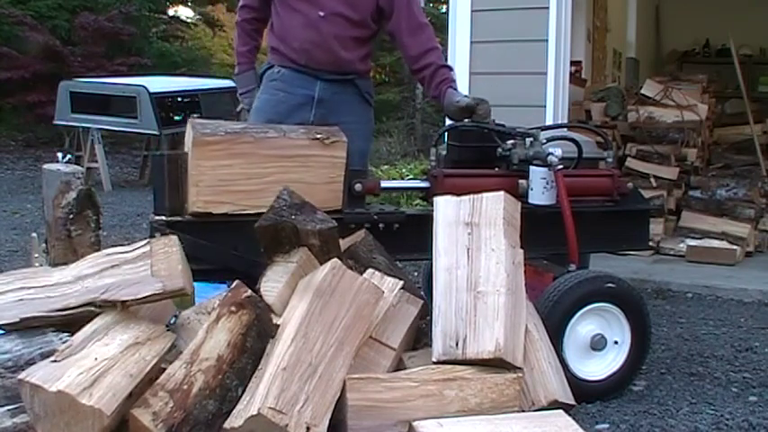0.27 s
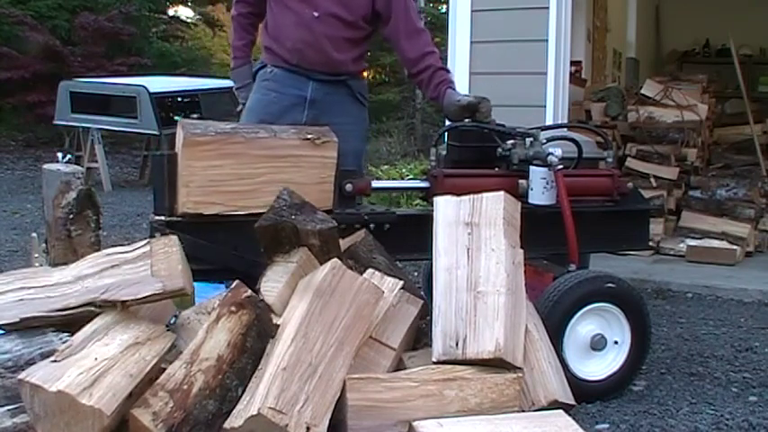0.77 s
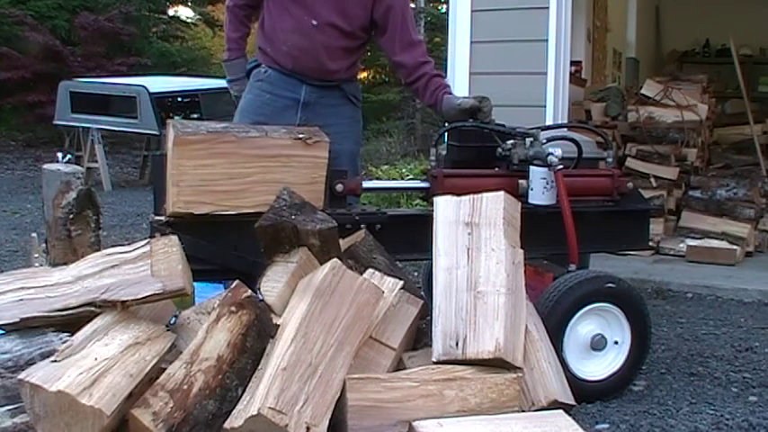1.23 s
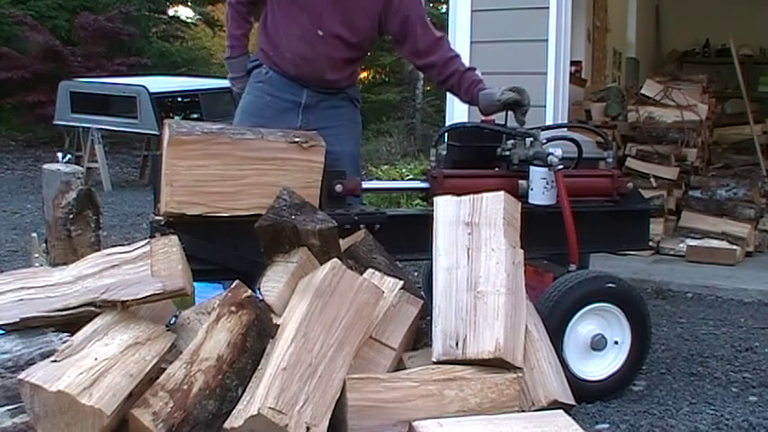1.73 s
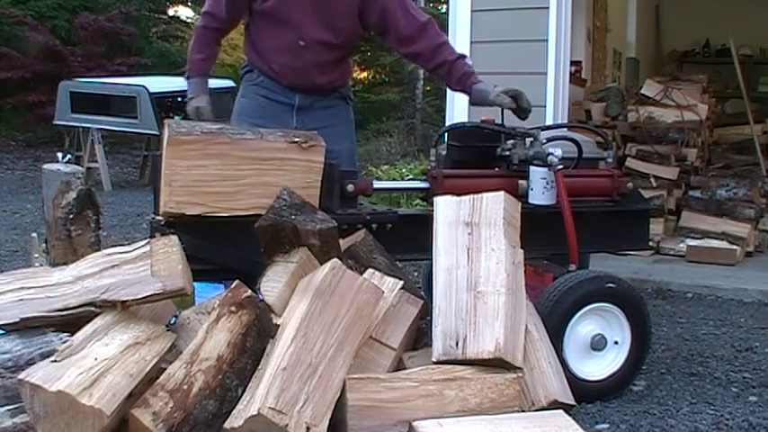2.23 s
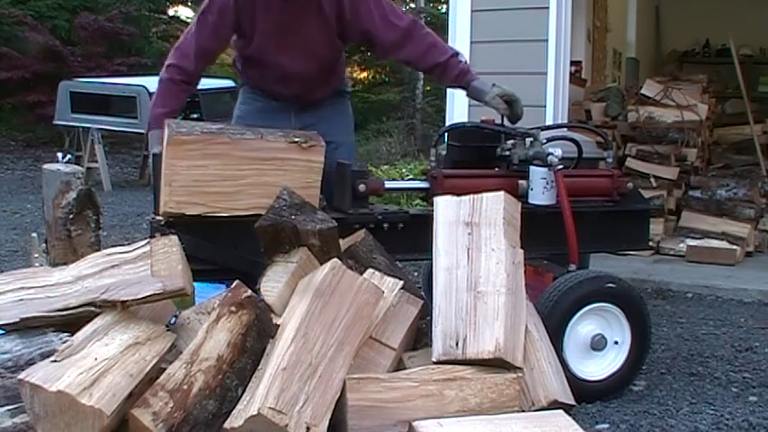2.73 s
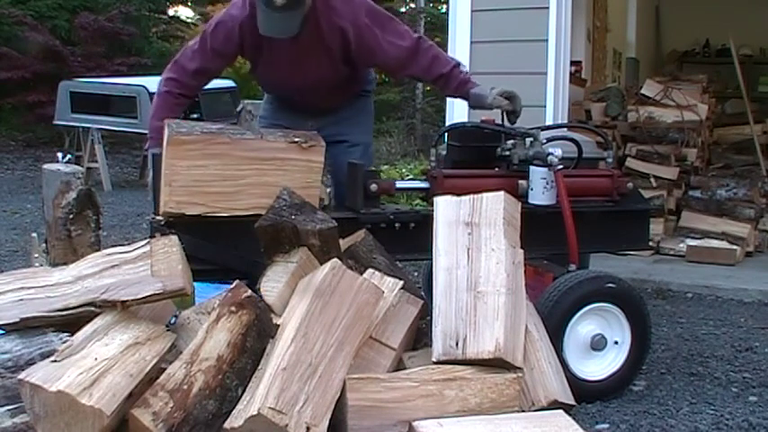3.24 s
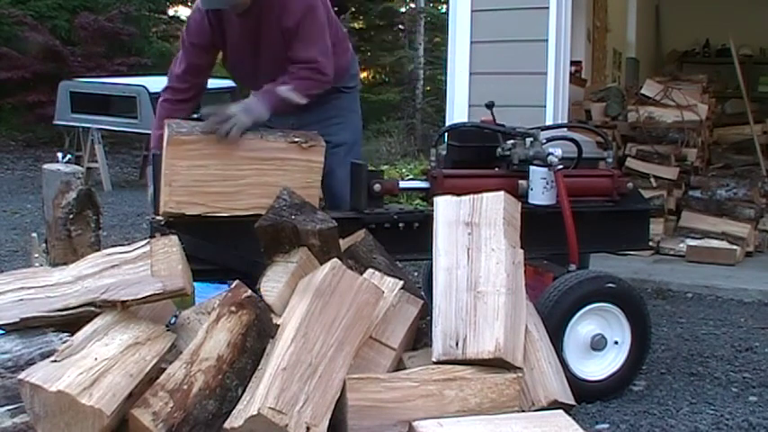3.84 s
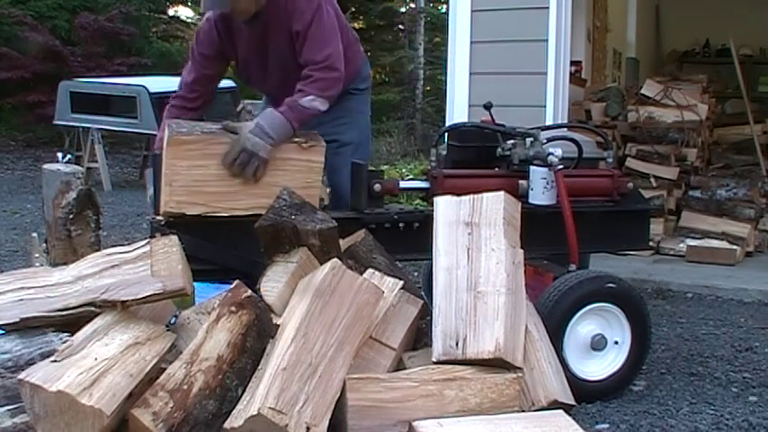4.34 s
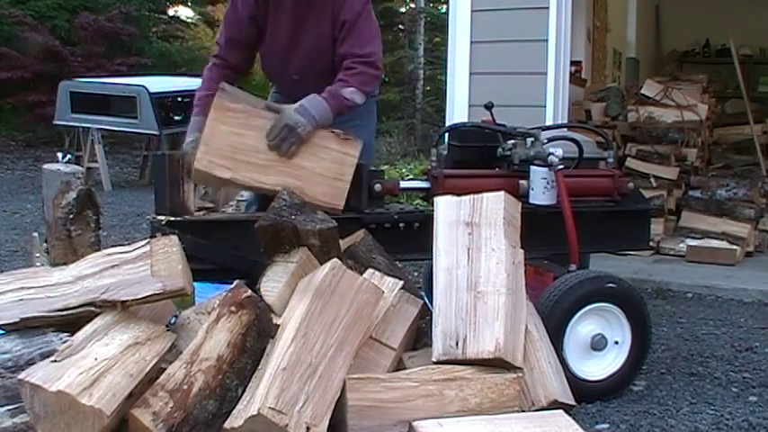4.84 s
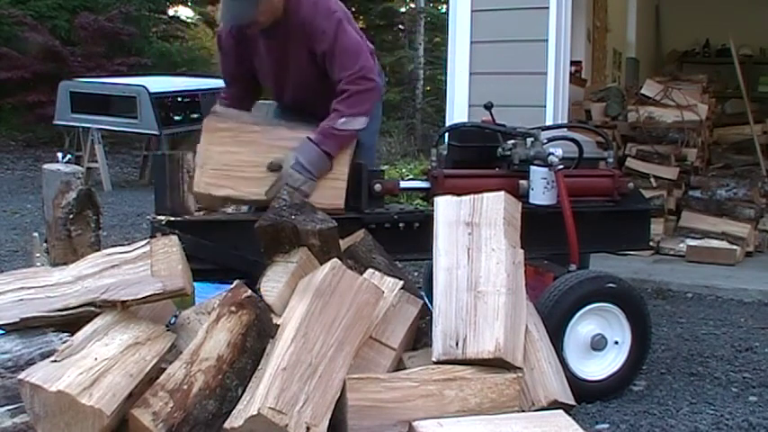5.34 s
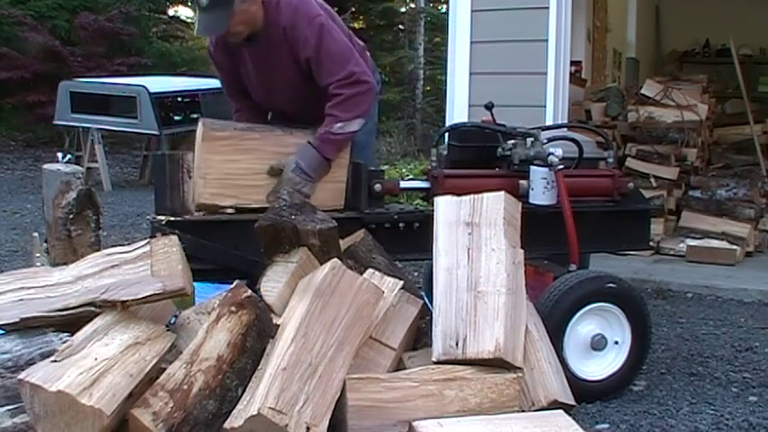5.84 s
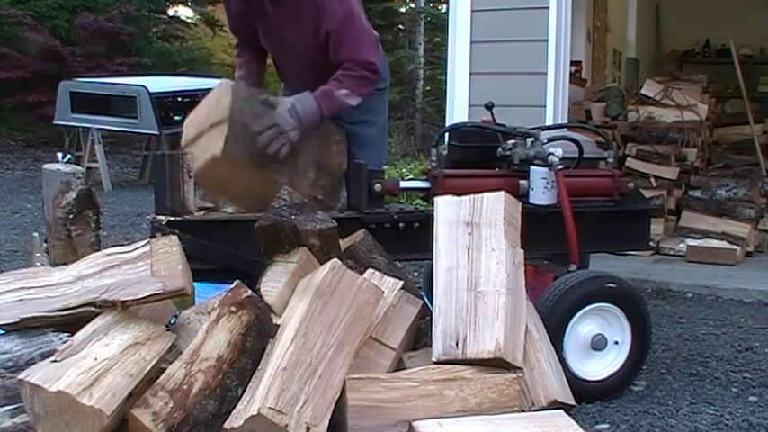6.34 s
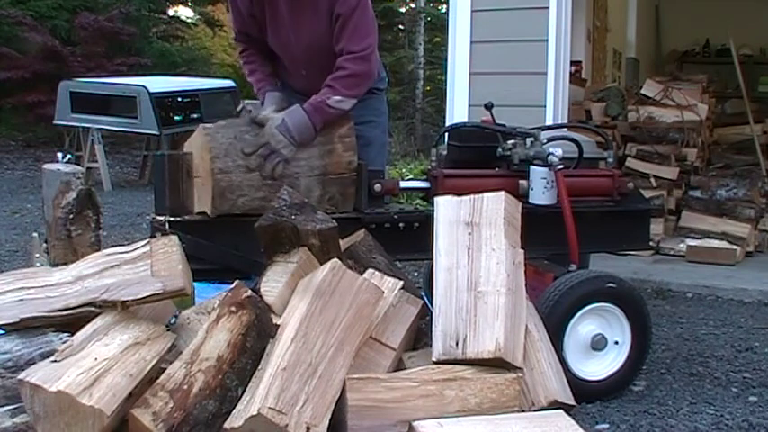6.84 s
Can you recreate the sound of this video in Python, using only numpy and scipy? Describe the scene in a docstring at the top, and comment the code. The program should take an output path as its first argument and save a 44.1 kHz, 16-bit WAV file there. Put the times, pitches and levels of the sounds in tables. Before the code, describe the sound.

A log splitter's small engine putters rapidly with a buzzing metal shroud and airy fan rush. In the first second wood fibres pop, rip and knock while the engine bogs down and recovers. After that it runs steadily, broken only by faint knocks and dry scuffs, until the heavy log thumps on the steel beam near the end. Close, dry, open-air stereo pickup, with the splitting slightly left.

```python
"""On a gravel yard, a single-cylinder four-stroke petrol engine drives a hydraulic log splitter.
The ram forces a log onto the wedge: wood groans, tears and cracks; the engine sags and its governor catches it.
Then the ram returns and the log is turned over on the beam, with knocks, scuffs and thuds.
The engine is a periodic source plus modulated noise and resonances; the wood is noise bursts and damped modes.
A gain control ducks at once on loud sounds and recovers slowly."""
import sys
import numpy as np
from scipy import signal
from scipy.fft import rfft, irfft, next_fast_len
from scipy.io import wavfile
from scipy.ndimage import uniform_filter1d, map_coordinates

SR = 44100
rng = np.random.default_rng(int(sys.argv[2]) if len(sys.argv) > 2 else 0)


def dump(signal):
    """Clip the signal to [-1, 1] and save it as 16-bit WAV at the path in sys.argv[1]."""
    limited = np.clip(np.atleast_2d(signal).T, -1, 1)
    pcm = np.round(limited * 32767).astype(np.int16)
    wavfile.write(sys.argv[1], SR, pcm)


N = 313110

# engine speed, sagging under load and caught by the governor: (time [s], rate [firings/s])
ENGINE_SPEED = [(0, 23.4), (0.25, 20.6), (0.5, 22.4), (0.76, 26.807), (0.96, 24.357), (1.19, 23.916),
                (1.49, 25.221), (2.16, 24.491), (2.5, 24.369), (3.01, 24.551), (3.39, 24.567),
                (3.87, 25.568), (4.32, 24.872), (4.96, 24.659), (5.95, 25.026), (6.42, 24.881),
                (6.7, 25.014), (7.1, 24.949)]
# how hard the engine works: (time [s], level [dB])
EFFORT = [(0, 0.5), (.25, -1), (.48, 0.5), (.75, 6), (1.2, 3), (1.65, 4.5), (2.3, -0.1), (3.6, -0.8),
          (3.95, 0.1), (4.5, -0.55), (7.1, -1.06)]
# how far the ram loads the engine: (time [s], share [0-1])
RAM_LOAD = [(0, 0.72), (1.5, 0.8), (2.1, 0.92), (3.4, 0.97), (3.8, 0.2), (4.4, 0.24)]
START_CYCLE = .475  # place in the engine cycle at the start

# exhaust spectrum after the muffler, ram moving and at rest: (multiple of firing rate [1], relative level [dB])
EXHAUST_WORKING = [(1, -50), (2, -36), (3, -33), (4, -9), (5, -4.5), (6, 4), (7, 0.5), (8, -1.5), (9, -10),
                   (10, 6), (11, 5), (12, -8), (13, -6.5), (14, -0.5), (15, -24), (16, -10), (17, -6),
                   (18, 2.5), (19, 4), (20, 1), (21, -0.5), (22, 1), (23, -3), (24, -6), (25, -7), (26, -5),
                   (27, -4), (28, -6.5), (29, -1)]
EXHAUST_IDLING = [(1, -33), (2, -32), (3, -24.5), (4, -6.5), (5, -4), (6, 4.5), (7, 5), (8, -7.5), (9, -4),
                  (10, 8), (11, -3.5), (12, 4), (13, -8), (14, 2.5), (15, -10), (16, 1), (17, -9), (18, -8),
                  (19, 5), (20, 5), (21, 4.5), (22, -6), (23, 1), (24, -0.5), (25, -2), (26, -23),
                  (27, -5.5), (28, -7), (29, 3)]
# the puff and its reflections in the pipe, ram moving and at rest: (place in cycle [0-1], strength [1])
PUFFS_WORKING = [(.36, 1), (.527, .63), (.616, .56), (0, .64)]
PUFFS_IDLING = [(.359, 1), (.801, -.62), (.236, .78), (.142, .2)]
# exhaust overtones above the muffler's cut-off: (time [s], gain [dB])
OVERTONES = [(0, -6), (.9, -7.5), (1.4, -6.5), (1.8, -3), (2.3, -1.5), (3.55, -3), (3.9, 0.5), (4.8, -1.5),
             (7.1, -0.5)]
# throttle held open by the governor: (time [s], opening [0-1])
THROTTLE = [(0, 1), (.3, 1), (.5, 0.5), (.65, 0.8), (.83, 1), (.87, 0.6), (1.5, .3), (2, 0.04)]
# weak burns as the governor snaps shut: (time [s], gain [dB])
WEAK_BURNS = [(.868, -7), (.945, -9)]
WEAK_BURN_S = 0.011  # standard deviation of each dip
BOOM_HZ, BOOM_WIDTH_HZ, BOOM_DB = 179, 15, 2.5  # muffler resonance; its gain at full throttle
EXHAUST_DB = -31  # at zero effort and zero ram load
RAM_EXHAUST_DB = 1.5  # added at full ram load

# modes of the sheet-metal cowl: (frequency [Hz], width [Hz], place in cycle [0-1])
COWL_MODES = [(765, 8, .33), (884, 6, .76), (899, 6, .76), (1525, 12, .6), (1675, 9, .2)]
# mean level of each of those modes: (level [dB])
COWL_LEVELS = [-32.5, -35, -35.5, -49, -41]
# crankcase knocks: (place in cycle [0-1], frequency [Hz], level with ram moving [dB], level at rest [dB]),
# both levels before effort and random scatter
CHUGS = [(.09, 840, -36, -28), (.31, 800, -18.5, -31), (.39, 800, -30, -22.5), (.66, 820, -29, -24),
         (.93, 850, -31, -22)]
CHUG_RISE_S, CHUG_SCATTER_DB, CHUG_SCATTER_OCTAVES = .0017, 2.3, .06

# clatter bursts: (place in cycle [0-1], standard deviation [cycles], relative strength [1])
STROKES = [(.01, 0.03, 0.68), (0.114, 0.0065, 0.68), (.39, 0.037, 0.35), (.565, 0.0046, 0.25),
           (.73, 0.079, 0.51)]
# share of the clatter that repeats in every cycle: (frequency [Hz], share [0-1])
REPEAT = [(300, .92), (800, .85), (1150, .55), (1600, .5), (2500, .38), (7000, .3)]
# engine block, valves and pump: (frequency [Hz], relative density [dB per Hz])
BLOCK_SPECTRUM = [(60, -43), (200, -12.5), (390, -11.5), (520, -7.5), (680, -5), (860, -1), (1080, -7),
                  (1450, -1.5), (1800, -4), (2250, -4), (2650, -11.5), (3050, -9), (3400, -6.5),
                  (5500, -25), (12000, -35)]
# rush of the cooling fan: (frequency [Hz], relative density [dB per Hz])
FAN_SPECTRUM = [(25, -13), (60, -7), (100, -26), (400, -3), (2000, 1), (3800, -3.5), (4200, 2.5),
                (6500, -1), (9000, 1.5), (11000, -0.5), (12500, -7.5), (16000, -16.5)]
CLATTER_DB, CLATTER_FOLLOWS = -23.5, 1  # machinery gain at zero effort; its rise in dB per dB of effort

# jolts of the shroud: (place in cycle [0-1], standard deviation [cycles], relative strength [1])
JOLTS = [(.05, .04, .8), (.36, .06, .8), (.64, .03, .6), (.8, .035, 1)]
# engine speeds at which the shroud's buzz is set: (rate [firings/s])
RASP_SPEEDS = [24.1, 24.4, 24.6, 24.75, 25, 25.5]
# buzz at each of those speeds, before swell and flutter: (relative level [dB])
RASP_LEVELS = [-7, -2, -5.5, -7.5, -5, -11]
# slow swells of the buzz: (time [s], gain [dB])
RASP_SWELL = [(1.9, 1), (2.3, 0.5), (2.9, 1), (3.3, -0.5), (4.4, 0.5), (4.7, -1.5), (5.5, -3), (5.7, 2.5),
              (5.95, -0.5), (6.13, 3.5), (6.35, 1)]
RASP_FLUTTER_DB = 1.8

# likeness of left and right in diffuse sound: (frequency [Hz], correlation [0-1])
ALIKE = [(130, 0.4), (300, 0.5), (700, 0.43), (1400, .5), (3000, 0.9), (12000, 0.56)]
# engine balance, left minus right: (frequency [Hz], level difference [dB])
LEAN = [(60, 16), (110, 0.5), (200, 3), (380, 2), (700, 1.5), (1290, 3), (2380, -1.5), (4400, -3),
        (8120, 1.5), (15000, -1)]
# phase by which the left leads for the engine: (frequency [Hz], phase [rad])
LEAD = [(100, 0), (860, 0.1), (2300, -1.52), (4000, -1.26), (9000, -1.33), (13000, -2), (16000, -6)]

# the log groans just before it gives: (time [s], standard deviation [s], frequency [Hz], level [dB])
GROANS = [(0.226, 0.042, 264, -31.5)]
# the log bumping on the beam:
# (time [s], relative level [dB], centre of woken modes [Hz], width [octaves], attack time constant [s])
THUDS = [(.229, 1, 230, 0.44, .002), (.6715, 14, 480, 0.28, 0.0011), (.679, -2, 474, 0.58, 0.0011),
         (.728, -1, 450, .4, 0.0018), (.762, 1, 480, .5, .002), (6.3038, 6.5, 700, 3, 0.0012),
         (6.326, -4, 330, 1, .002), (6.351, 4, 450, 0.31, 0.0018), (6.4085, 7.5, 620, 0.24, 0.004),
         (6.428, -10, 600, .7, 0.00091), (6.468, -9.5, 600, 0.47, 0.0025)]
# modes of the log: (frequency [Hz], relative level [dB], decay by 60 dB [s])
LOG_MODES = [(230, -5.5, 0.054), (460, -7, 0.052), (558, -4.5, 0.047), (630, 4, 0.037), (756, 0.5, 0.057)]
# wood fibres snapping at the wedge: (time [s], relative level [dB], centre [Hz], relative width [octaves])
CRACKS = [(.241, -5, 4400, 3.2), (0.279, -13, 6000, 2.3), (0.2872, -6, 6500, 4.3), (0.3152, -8, 2400, 3.7),
          (0.327, -3.5, 9800, 0.16), (0.3706, -7.5, 7500, 0.98), (.393, 0.5, 2700, 0.82),
          (0.4413, 7, 1520, 0.75), (.462, 4.5, 10900, 0.38), (.512, -7, 9500, 0.69), (.5395, -9, 9050, 1.1),
          (.588, -5, 2600, 1.6), (.611, -5, 8750, 0.69), (0.625, -2, 1830, 0.39), (.6717, -3.5, 1400, 3.5),
          (.675, -7, 1340, 0.62), (0.6793, -2.5, 2400, 1.9), (0.757, -7, 7500, .9),
          (0.7608, 2.5, 7540, 1.5), (.817, -3, 9000, .9), (.8306, 6.5, 8300, 0.39),
          (1.0176, 4.5, 9500, 0.39), (1.048, -3.5, 9000, 0.2), (1.0523, -7, 2700, 0.68),
          (1.1096, -0.5, 8800, 0.29), (1.13, -1, 10000, 0.36), (1.1548, -6.5, 4500, 2.1),
          (1.2043, 4, 9200, 0.22)]
CRACK_PAN_DB = 2  # left minus right: the wedge stands to the left
# the log's answer to each crack: (frequency [Hz], relative density [dB per Hz])
WOOD_BODY = [(200, -28), (500, -16), (1300, -1), (2800, -1), (5000, -4.5), (9000, -18)]
WOOD_BODY_DB, WOOD_BODY_T60_S = -13, .05  # level against the crack's table level; decay by 60 dB
# spells of tearing along the wedge: (start [s], end [s], relative level [dB])
TEARS = [(0.295, 0.446, -16.5), (0.594, 0.798, -17), (0.886, 1.152, -22)]
TEAR_RISE_DB_PER_S, TEAR_FALL_DB_PER_S = 113, 134
# torn fibres: (frequency [Hz], relative density [dB per Hz])
SPLINTERS = [(100, -32), (230, -14), (450, 5.5), (1000, 1), (1500, 4), (2800, -1.5), (5000, -7),
             (10000, 2.5), (16000, -16)]
SMALL_SNAPS_PER_S, SMALL_SNAP_DB, SMALL_SNAP_HZ = 10, -13, 9000  # mean rate; middle of the level and pitch scatter

# knocks of the lever and the handled log: (time [s], relative level [dB], centre [Hz], relative width [octaves])
KNOCKS = [(1.682, -11, 6240, 0.59), (3.4358, -16, 6900, .9), (3.5576, -14, 5800, 1.7),
          (4.5056, -9, 9000, 0.32), (4.886, -15, 2080, 0.18), (6.376, -19, 1100, .3)]
KNOCK_PAN_DB = 3  # left minus right
# echo from the operator moving about the engine: (time [s], delay [s], strength [1])
ECHO = [(1.9, .0051, 0), (2.3, .0051, .2), (2.8, .0051, .2), (3.05, .0051, 0), (4.25, .0038, 0),
        (4.6, .0038, .8), (5.4, .0038, .8), (5.65, .0038, 0)]
# gloves and bark scuffing on lever and beam: (time [s], standard deviation [s], relative level [dB])
SCUFFS = [(3.439, 0.003, -12.5), (3.552, 0.0053, -22), (3.575, 0.013, -25), (5.869, 0.044, -28)]
# scuffed bark: (frequency [Hz], relative density [dB per Hz])
BARK_SPECTRUM = [(1000, -31), (4000, -6), (7500, -4), (10000, 5), (12000, -6), (16000, -34)]

# the gain control reacts more to treble than to bass: (frequency [Hz], weight [dB])
SENSITIVITY = [(600, -1.5), (8000, 1.5)]
TOP_HZ = 16100  # upper band limit


def amp(db):
    """Decibel law: level to amplitude ratio."""
    return 10 ** (np.asarray(db) / 20)


def unit(x):
    """Normalisation to a root mean square of 1."""
    return x / np.sqrt(np.mean(x ** 2) + 1e-20)


def along(points, hz):
    """Linear interpolation of (frequency, value) points on a logarithmic frequency axis."""
    f, v = np.transpose(points)
    return np.interp(np.log(hz + 1), np.log(f + 1), v)


def curves(rows):
    """Linear interpolation in time: one value per sample for each column after the time."""
    s, *columns = np.transpose(rows)
    return [np.interp(np.arange(N) / SR, s, column) for column in columns]


def wobble(rate):
    """Band-limited random modulation: a smooth curve through random knots, rate of them a second."""
    knots = rng.standard_normal(200 + int(N * rate / SR))
    return map_coordinates(knots, [np.arange(N) * rate / SR])


def filtered(x, response):
    """Linear filtering: the spectrum of x times a complex response of frequency."""
    m = next_fast_len(N + SR // 2)
    return irfft(rfft(x, m) * response(np.fft.rfftfreq(m, 1 / SR)), m)[..., :N]


def resonance(x, centre_hz, width_hz):
    """Damped harmonic oscillator: x rings through one mode with unit gain at its centre."""
    return filtered(x, lambda f: 1j * f * width_hz / (centre_hz ** 2 - f ** 2 + 1j * f * width_hz))


def power(x, seconds):
    """Short-time power: the running mean square."""
    return np.abs(uniform_filter1d(x ** 2, max(1, int(seconds * SR)))) + 1e-12


def add(track, s, sound):
    """Superposition: lay a sound into a track at s seconds."""
    part = track[..., round(s * SR):][..., :sound.shape[-1]]
    part += sound[..., :part.shape[-1]]


def spread(pair, spectrum):
    """Partial coherence: two unrelated signals become a coloured, partly alike stereo pair of rms 1."""
    def turn(hz):
        return np.arccos(np.clip(along(ALIKE, hz), -1, 1)) / 2

    def response(hz):
        return amp(along(spectrum, hz)) * [np.cos(turn(hz)), np.sin(turn(hz))]

    mid, side = filtered(pair, response)
    return unit(np.array([mid + side, mid - side]))


def each_cycle(orders, cycle):
    """Fourier synthesis: repeat the wave with these complex orders once per engine cycle."""
    wave = irfft(orders, 2 ** 13)
    return unit(np.interp(cycle % 1, np.arange(len(wave)) / len(wave), wave))


def gaussian(distance, length):
    """Gaussian envelope: 1 at the centre, with length as its standard deviation."""
    return np.exp(-.5 * (distance / length) ** 2)


def exhaust(cycle, muffler, puffs, dispersion):
    """Pipe echoes and dispersion: one puff a cycle, its higher notes later, its strength varying per burn."""
    order, db = np.transpose(muffler)
    k = np.arange(order[-1] + 1)
    arrivals = sum(strength * np.exp(-2j * np.pi * k * place) for place, strength in puffs)
    phase = np.angle(arrivals) - np.pi * dispersion * k ** 2
    notes = amp(np.interp(k, order, db)) * np.exp(1j * phase)
    burn = np.floor(cycle - puffs[0][0] + 1).astype(int)
    burn_strength = uniform_filter1d(amp(.5 * rng.standard_normal(200))[burn], size=100)
    return burn_strength * each_cycle(notes, cycle)


def governed(pipe):
    """Cavity resonance: an open throttle makes the muffler boom; weak burns dip the level as it shuts."""
    t = np.arange(N) / SR
    weak_db = sum(db * gaussian(t - s, WEAK_BURN_S) for s, db in WEAK_BURNS)
    boom = amp(BOOM_DB) * curves(THROTTLE)[0] * resonance(pipe, BOOM_HZ, BOOM_WIDTH_HZ)
    return amp(weak_db) * (pipe + boom)


def exhaust_note(cycle, load):
    """Load-dependent pulse spectrum: working and idling exhaust are blended, levelled and made turbulent."""
    working = exhaust(cycle, EXHAUST_WORKING, PUFFS_WORKING, dispersion=.0073)
    idling = exhaust(cycle, EXHAUST_IDLING, PUFFS_IDLING, dispersion=.0128)
    pipe = load * working + (1 - load) * idling
    pipe = amp(RAM_EXHAUST_DB * load) * pipe / np.sqrt(power(pipe, .16))
    overtones = filtered(pipe, lambda hz: 1 - 1 / (1 + (hz / 220) ** 8))
    pipe = pipe + (amp(curves(OVERTONES)[0]) - 1) * overtones
    return governed(pipe) * amp(0.43 * wobble(70))  # the gas flow is turbulent


def cowl(cycle, shaking=0.28, unlike=0.2):
    """Forced vibration: modes struck once a cycle and shaken by noise swell as firing multiples meet them."""
    out = 0
    for (centre, width, place), db in zip(COWL_MODES, COWL_LEVELS):
        blows = unit(np.diff(np.floor(cycle - place), prepend=np.floor(-place)))
        drive = blows + shaking * rng.standard_normal(N) + unlike * rng.standard_normal((2, N))
        out = out + amp(db) * unit(resonance(drive, centre, width))
    return out


def chugs(cycle, speed, load):
    """Impulse response: firing and piston reversals knock the crankcase, each varying in strength and pitch."""
    out = 0
    for place, hz, working_db, resting_db in CHUGS:
        turn, part = np.divmod(cycle - place + 1, 1)
        size, pitch = rng.standard_normal((200, 2))[turn.astype(int)].T
        t = part / speed  # seconds since the knock
        level = amp(load * working_db + (1 - load) * resting_db + CHUG_SCATTER_DB * size)
        envelope = t / CHUG_RISE_S * np.exp(1 - t / CHUG_RISE_S)
        ring = np.sin(2 * np.pi * hz * 2 ** (CHUG_SCATTER_OCTAVES * pitch) * t)
        out = out + level * envelope * ring
    return out


def strokes(cycle, bursts, depth):
    """Cyclic amplitude modulation: noise swells at fixed places in the engine cycle."""
    swell = sum(strength * gaussian((cycle - place + .5) % 1 - .5, length) for place, length, strength in bursts)
    return unit(1 + depth * swell)


def rattle_pattern(cycle, drift=0.82, count=500):
    """Periodic impact noise: a dense pattern repeats each cycle and slowly turns into another."""
    def orders():
        return rng.uniform(.5, 1.5, count) * np.exp(2j * np.pi * rng.random(count))

    turn = drift * wobble(1.274)
    return np.cos(turn) * each_cycle(orders(), cycle) + np.sin(turn) * each_cycle(orders(), cycle)


def clatter(cycle):
    """Periodic and random impact noise: piston, valves and pump repeat partly from cycle to cycle."""
    def share(hz):
        return np.clip(along(REPEAT, hz), 0, 1)

    patterns = np.array([rattle_pattern(cycle), rattle_pattern(cycle)])
    same = filtered(patterns, lambda hz: np.sqrt(share(hz)))
    fresh = filtered(rng.standard_normal((2, N)), lambda hz: np.sqrt(1 - share(hz)))
    swell = strokes(cycle, STROKES, depth=0.14) * amp(0.44 * wobble(260))
    return spread((0.8 * same + fresh) * swell, BLOCK_SPECTRUM)


def fan(cycle):
    """Turbulent flow noise: the cooling fan's rush pulses with the engine cycle and flutters."""
    swell = strokes(cycle, STROKES, depth=0.54) * amp(1.3 * wobble(400))
    return spread(rng.standard_normal((2, N)) * swell, FAN_SPECTRUM)


def rasp(cycle, speed, centre_hz=1565, width_hz=300):
    """Excited resonance: the shroud buzzes when jolted several times a cycle, more at certain speeds."""
    noise = rattle_pattern(cycle) + 0.7 * rng.standard_normal((2, N))
    drive = noise * strokes(cycle, JOLTS, depth=4)
    level_db = np.interp(speed, RASP_SPEEDS, RASP_LEVELS)
    level_db = level_db + curves(RASP_SWELL)[0] + RASP_FLUTTER_DB * wobble(25)
    return amp(level_db) * unit(resonance(drive, centre_hz, width_hz))


def reflections(x, echo_db=-10, above_hz=1500, count=14):
    """Comb interference: beam, ground and woodpile echoes ripple the treble differently on each side."""
    taps = np.zeros((2, SR // 100))
    for channel in taps:
        delays = rng.integers(SR // 1000, SR // 100, count)  # 1 to 10 ms
        channel[delays] = rng.choice([-1, 1], count) / np.sqrt(count)
    treble = filtered(x, lambda hz: hz ** 2 / (hz ** 2 + above_hz ** 2))
    return x + amp(echo_db) * signal.fftconvolve(treble, taps, axes=1)[:, :N]


def engine():
    """Crankshaft periodicity: one phase drives all but the echoes; effort lifts all but the cowl."""
    speed, = curves(ENGINE_SPEED)
    effort_db, = curves(EFFORT)
    load = np.clip(curves(RAM_LOAD)[0], 0, 1)
    cycle = START_CYCLE + np.cumsum(speed) / SR
    burning = amp(EXHAUST_DB) * exhaust_note(cycle, load) + chugs(cycle, speed, load)
    machinery = reflections(amp(1.0) * clatter(cycle) + fan(cycle) + rasp(cycle, speed))
    sound = amp(effort_db) * burning + cowl(cycle)
    sound = sound + amp(CLATTER_DB + CLATTER_FOLLOWS * effort_db) * machinery
    sound = moving_echo(sound)
    # the engine stands to the right: over most of the range the left hears it a little later
    side = np.array([[.5], [-.5]])
    return filtered(sound, lambda hz: amp(side * along(LEAN, hz)) * np.exp(1j * side * along(LEAD, hz)))


def groans():
    """Frequency modulation: the strained log hums briefly on a wavering note."""
    t = np.arange(N) / SR
    phase = 2 * np.pi * np.cumsum(1 + 0.043 * wobble(52)) / SR
    return sum(amp(db) * np.sqrt(2) * gaussian(t - s, length) * np.sin(hz * phase)
               for s, length, hz, db in GROANS)


def thuds():
    """Modal decay: the heavy log rings only briefly when it meets the beam."""
    out, t = np.zeros(N), np.arange(SR // 5) / SR
    for s, db, centre, width, attack in THUDS:
        ring = 0
        for hz, level, t60 in LOG_MODES:
            woken = gaussian(np.log2(hz / centre), width)
            ring = ring + woken * amp(level - 60 * t / t60) * np.sin(2 * np.pi * hz * t)
        add(out, s, amp(db - 11.5) * ring * (1 - np.exp(-t / attack)))
    return out * amp([[2], [-2]])


def cracks(rows, pan_db, tail_t60=0.097, tail_db=-28, unlike=0.95):
    """Impulsive fracture: each snap is a band of noise lasting milliseconds, with faint woodpile scatter."""
    out, t = np.zeros((2, N)), np.arange(SR // 10) / SR
    octave = np.log2(np.fft.rfftfreq(len(t), 1 / SR) + 1)
    burst = amp(-60 * t / .0095) * (1 - np.exp(-t / .0002))
    fade = burst + amp(tail_db - 60 * t / tail_t60)
    pan = amp([[pan_db / 2], [-pan_db / 2]])
    for s, db, hz, width in rows:
        noise = rng.standard_normal(len(t)) + unlike * rng.standard_normal((2, len(t)))
        band = 1 / (1 + ((octave - np.log2(hz)) / width / 1.1) ** 2)
        colour = band / np.sqrt(2 ** octave + 1500) / (1 + (2 ** octave / 14000) ** 6)
        colour = colour * (octave < np.log2(TOP_HZ))
        snap = irfft(rfft(noise) * colour, len(t)) * fade * pan
        peak = np.sqrt(power(snap, .004).mean(0).max())
        add(out, s, amp(db - 1) * snap / peak)
    return out


def wood_body():
    """Structural response: every crack shakes the log, adding a short woody burst in the middle range."""
    level, t = np.zeros(N), np.arange(SR // 10) / SR
    for s, db, _, _ in CRACKS:
        add(level, s, amp(db + WOOD_BODY_DB - 60 * t / WOOD_BODY_T60_S))
    return level * spread(rng.standard_normal((2, N)), WOOD_BODY) * amp([[2], [-2]])


def tearing(rate=3000):
    """Shot noise: many small fibres give way unequally; each spell swells, holds and fades."""
    t = np.arange(N) / SR
    level_power = 0
    for start, end, db in TEARS:
        rise_db = TEAR_RISE_DB_PER_S * np.maximum(start - t, 0)
        fall_db = TEAR_FALL_DB_PER_S * np.maximum(t - end, 0)
        level_power = level_power + amp(db - rise_db - fall_db) ** 2
    sizes = amp(3 * np.minimum(rng.exponential(size=N), 2.5))
    snaps = (rng.random(N) < rate / SR) * sizes
    burst = signal.lfilter([1], [1, -np.exp(-1 / (0.00032 * SR))], snaps)  # time constant 0.32 ms
    fibres = spread(burst * rng.standard_normal((2, N)), SPLINTERS)
    return np.sqrt(level_power) * fibres * amp([[2], [-2]])


def small_snaps(scatter_db=3, scatter_octaves=0.44):
    """Random point process: rows like CRACKS for thin splinters, from the first tear to the end of the last."""
    times = np.arange(TEARS[0][0], TEARS[-1][1], 1 / SMALL_SNAPS_PER_S)
    chance = rng.uniform(-1, 1, (100, 3))
    rows = []
    for s, (late, size, pitch) in zip(times, chance):
        hz = SMALL_SNAP_HZ * 2 ** (scatter_octaves * pitch)
        rows.append((s + late / SMALL_SNAPS_PER_S / 2, SMALL_SNAP_DB + scatter_db * size, hz, 1))
    return rows


def moving_echo(x, centre_hz=430, width_octaves=0.39):
    """Interference: a near echo of the low middle range lifts some engine notes and hollows out others."""
    delay, strength = curves(ECHO)
    t = np.arange(N) / SR
    band = filtered(x, lambda hz: gaussian(np.log2((hz + 1) / centre_hz), width_octaves))
    return x + strength * np.array([np.interp(t - delay, t, channel) for channel in band])


def scuffs():
    """Friction noise: short dry rubs that swell and fade."""
    t = np.arange(N) / SR
    pressure = sum(amp(db) * gaussian(t - s, length) for s, length, db in SCUFFS)
    return pressure * spread(rng.standard_normal((2, N)) * amp(2.4 * wobble(600)), BARK_SPECTRUM)


def scene(wood_cut_hz=190):
    """Superposition of machine and wood; the wood sounds are high-passed at wood_cut_hz."""
    splitting = groans() + tearing() + wood_body()
    splitting = splitting + cracks(CRACKS, CRACK_PAN_DB) + cracks(small_snaps(), CRACK_PAN_DB)
    handling = cracks(KNOCKS, KNOCK_PAN_DB) + scuffs() + thuds()
    high_pass = signal.butter(2, wood_cut_hz, "high", fs=SR, output="sos")
    return engine() + signal.sosfilt(high_pass, splitting + handling)


def record(dry, release_db=15, low_cut_hz=88):
    """Dynamic compression: loud sound ducks the gain, which recovers at release_db a second; then band limits."""
    sensed = filtered(dry, lambda hz: amp(along(SENSITIVITY, hz)))
    excess = np.maximum(10 * np.log10(power(sensed, .004).mean(0)) + 13, 0)  # dB above the -13 dB threshold
    recovery = release_db * np.arange(N) / SR
    duck_db = np.maximum.accumulate(excess + recovery) - recovery
    held = np.clip(dry * amp(-uniform_filter1d(duck_db, size=44)), -1, 1)

    def low_cut(hz):
        return np.maximum(1 / np.sqrt(1 + (low_cut_hz / (hz + 1)) ** 10), amp(-17.0))

    return filtered(held, lambda hz: low_cut(hz) * (hz < TOP_HZ))


dry = scene()
out = record(dry)
dump(out)
```